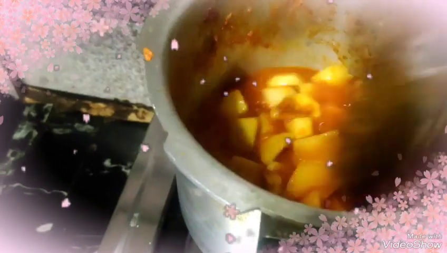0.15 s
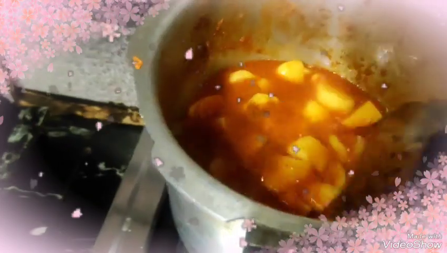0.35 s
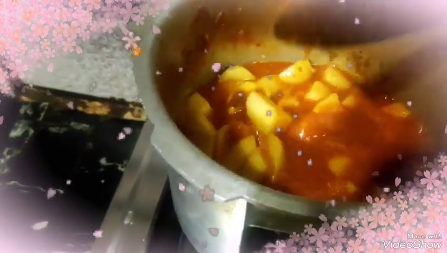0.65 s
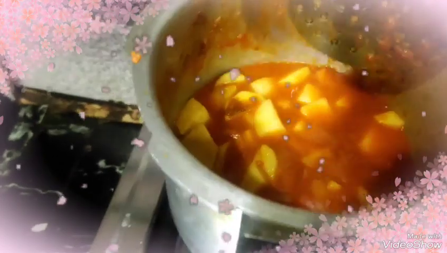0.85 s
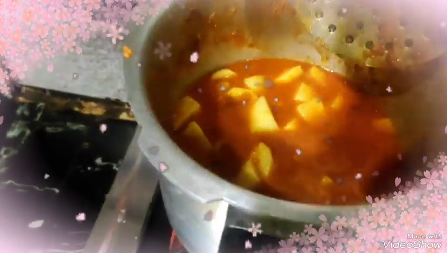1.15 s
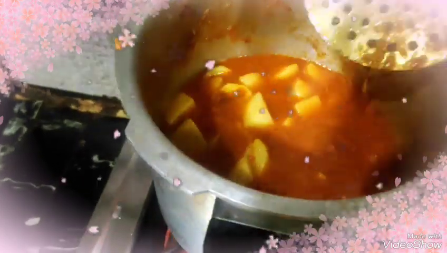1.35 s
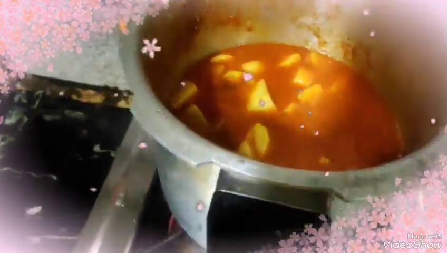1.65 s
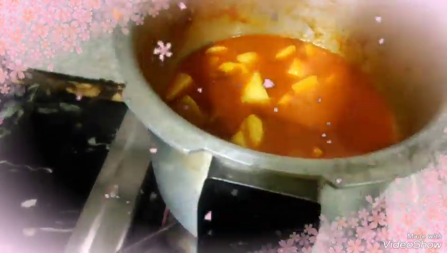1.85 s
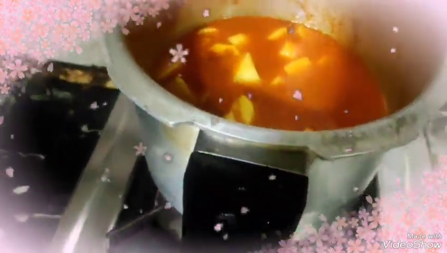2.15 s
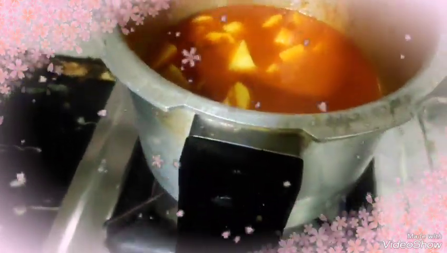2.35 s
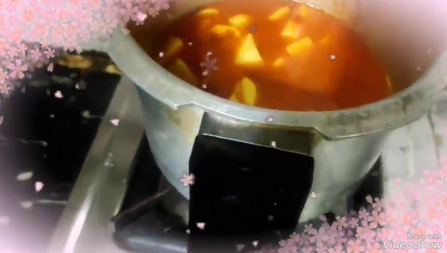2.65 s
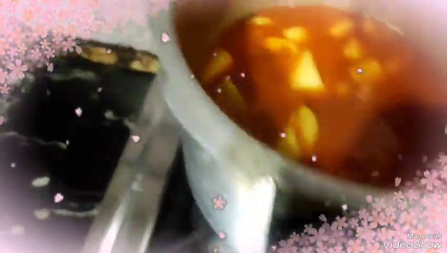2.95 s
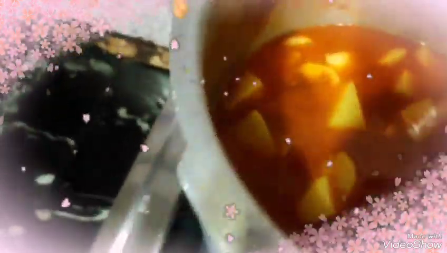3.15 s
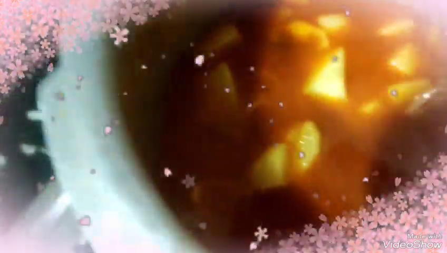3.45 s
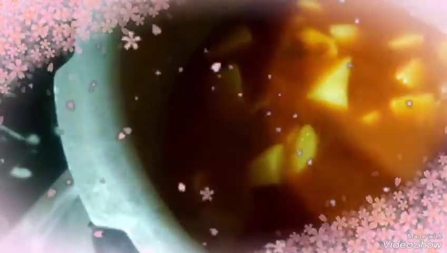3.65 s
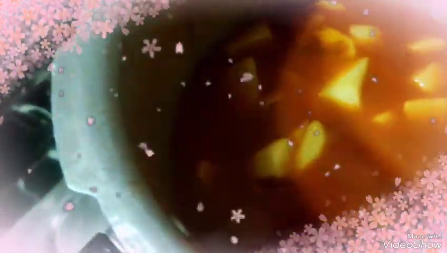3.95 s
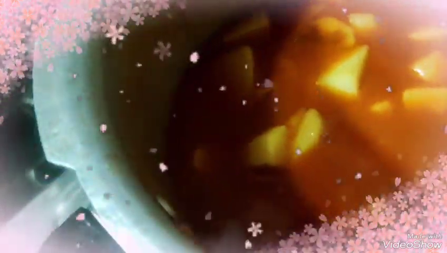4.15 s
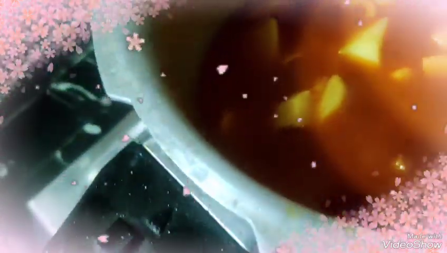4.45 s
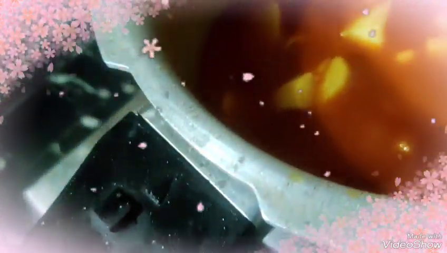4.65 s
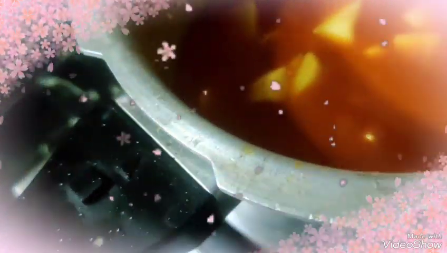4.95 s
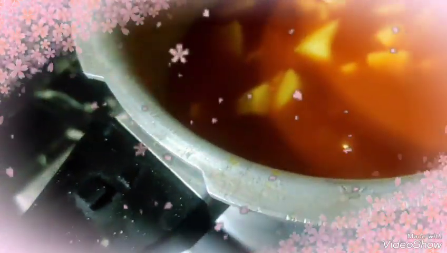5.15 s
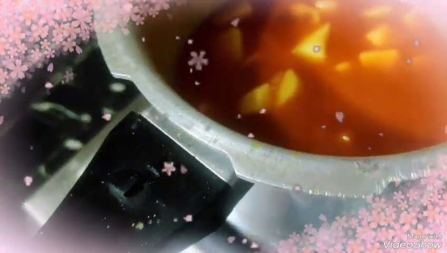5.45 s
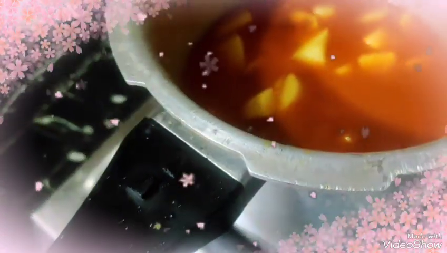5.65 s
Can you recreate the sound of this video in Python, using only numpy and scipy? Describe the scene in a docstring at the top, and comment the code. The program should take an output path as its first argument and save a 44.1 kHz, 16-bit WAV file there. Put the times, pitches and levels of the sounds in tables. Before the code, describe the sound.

Sharp clanging ladle knocks on a thick metal pot, a near-silent pause, then jerky rasping scrapes with bright squeals in a small hard kitchen.

```python
"""Stirring curry and knocking the ladle

A steel ladle stirs curry in a thick metal pot, is knocked four times on the rim to shake it clean,
clinks lightly, and then scrapes hard over the metal. Each contact mixes bursts of shaped noise with
fading sine waves: it clicks, rings the metal and rocks the pot. Rising tones make the curry slop,
jerky noise makes the scrape, and a small hard kitchen with a low hum answers close to the microphone."""
import sys
import numpy as np
from scipy import signal
from scipy.fft import rfft, irfft
from scipy.io import wavfile
from scipy.ndimage import uniform_filter1d, map_coordinates

SR = 44100
rng = np.random.default_rng(int(sys.argv[2]) if len(sys.argv) > 2 else 0)


def log_audio(samples):
    """Write samples as a 16-bit WAV file to the path given in sys.argv[1]."""
    # one column per channel
    frames = np.atleast_2d(samples).T
    # limit to full scale, then quantise
    limited = np.clip(frames, -1, 1)
    pcm = np.round(limited * 32767).astype(np.int16)
    wavfile.write(sys.argv[1], SR, pcm)


N = 256380
TIME = np.arange(N) / SR  # seconds through the scene
AGE = TIME[:SR]  # seconds since a contact, up to one
TOP_HZ = 16300  # upper limit of the sound

# All levels in the tables are those before the final mix.
# square blows that rock the whole pot: start_s [s], strength_db [dB], click_db [dB], wall_ring_db [dB],
# favoured_hz [Hz], favoured_db [dB], left_minus_right_db [dB]
BLOWS = [(0.072, -43.5, -37, -65.5, 236, -33, -1), (0.915, -18, -10, -25.5, 360, -25, 3.5),
         (1.165, -14, -4.5, -32, 3093, -29.5, 0), (1.4058, -16.5, -7, -25, 1364, -19, -2),
         (1.974, -29.5, -11.5, -43.5, 2767, -37, -1), (1.995, -34.5, -22, -62, 347, -30, 4),
         (2.013, -33, -18, -48.5, 809, -31, 1.5), (2.057, -51, -22, -43, 5280, -48, -1),
         (4.019, -51.5, -54, -73, 1036, -50.5, 1)]
# glancing hits on the wall: start_s [s], strength_db [dB], click_db [dB], wall_ring_db [dB],
# favoured_hz [Hz], favoured_db [dB]
GLANCES = [(0.2759, -17, -10, -29, 8700, -43), (0.295, -41, -30, -25.5, 6580, -37),
           (0.395, -27, -20.5, -50, 368, -41), (0.48, -21.5, -14.5, -57, 733, -20),
           (0.534, -37, -28.5, -50.5, 2620, -60), (4.105, -56, -66, -68, 770, -48.5),
           (4.229, -45, -63, -62, 2780, -76), (4.835, -54.5, -44, -62, 690, -57),
           (4.875, -29.5, -27.5, -45, 6040, -36), (4.894, -31, -18, -48, 7170, -34),
           (5.055, -33.5, -47, -52, 2280, -44), (5.136, -32.5, -21, -40, 865, -44),
           (5.212, -37, -34, -35, 6370, -31), (5.41, -43, -44, -57, 4730, -40),
           (5.556, -27.5, -38, -40, 1610, -18.5), (5.575, -20, -30, -47, 483, -27.5),
           (5.67, -28, -31, -21, 5200, -31), (5.771, -17, -19, -23, 7030, -37)]
# scraping strokes: start_s [s], length_s [s], rasp_db [dB], swell_db over the stroke [dB],
# edge_hiss_db relative to the rasp [dB]
STROKES = [(0.086, 0.042, -58.5, 7, -6), (0.395, 0.02, -36, -11, -14), (0.443, 0.015, -59, -15, -18),
           (1.764, 0.011, -58, 4.5, 2.5), (3.589, 0.265, -67, -16, 18.5), (3.938, 0.33, -62, 2.5, -2.5),
           (4.447, 0.062, -67.5, 1, 5), (4.61, 0.025, -66, -2.5, 8), (4.85, 0.021, -39, 8, -20),
           (4.875, 0.026, -29.5, 2.5, 2.5), (4.963, 0.018, -46, 9, -15), (5.057, 0.025, -30.5, -2.5, 0),
           (5.09, 0.025, -37.5, -6, 6), (5.14, 0.06, -31.5, -3, 10), (5.201, .022, -27, -2.5, 2.5),
           (5.237, 0.041, -30.5, 1.5, -3.5), (5.293, 0.035, -28.5, -4.5, -13), (5.335, 0.021, -30, 1.5, 2),
           (5.401, 0.03, -28, -3.5, -28), (5.472, 0.041, -43.5, 5, -14), (5.56, 0.031, -27, 2, -0.5),
           (5.615, 0.019, -33, 1, 4), (5.649, 0.093, -23.5, 3.5, 2), (5.759, 0.042, -20, 3, -0.5)]
# ringing modes of the whole pot: pitch_hz [Hz], level_db [dB], t60_s, time to fall 60 dB [s]
POT_MODES = [(280.1, -18, 0.35), (344.8, 5.5, 0.36), (461, -11, 0.49), (549, -10, 0.32),
             (709.4, 10.5, 0.31), (823, 4, 0.27), (859, 1.5, 0.21), (927, -5, 0.2), (1010, -4.5, 0.34),
             (1120, -13, 0.1), (1290, -8.5, 0.22)]
# spectrum of the rocking pot: frequency_hz [Hz], density_db [dB per Hz]
BODY_SPECTRUM = [(30, -40), (70, -20), (105, -8.5), (140, -17), (190, -5), (270, -7), (360, 2.5),
                 (560, -10.5), (780, 2.5), (1000, -10), (1600, -21.5), (4000, -54.5)]
# the sloshing curry makes each ring's pitch wander by about this share
POT_WANDER, WALL_WANDER = 0.015, 0.003


def undb(db):
    """Turn decibels into a plain gain."""
    return 10 ** (np.asarray(db) / 20)


def unit(x):
    """Scale to an average strength (rms) of 1."""
    return x / np.sqrt(np.mean(x ** 2))


def gains(points, size):
    """Read a spectrum of (Hz, dB) points as a gain for each frequency of a transform."""
    hz, db = np.transpose(points)
    bins_hz = np.arange(size // 2 + 1) * SR / size
    return undb(np.interp(np.log(bins_hz + 1), np.log(hz), db))


def colour(x, points):
    """Shape a signal's spectrum, at rms 1."""
    return unit(irfft(rfft(x) * gains(points, len(x)), len(x)))


def noise(points, size=SR, patchy_db=0, patch_hz=140):
    """Countless overlapping modes as noise; the contact point favours some groups of them."""
    hz = np.arange(size // 2 + 1) * SR / size
    patches = np.interp(hz / patch_hz, np.arange(1024), rng.standard_normal(size=1024))
    patchy = irfft(rfft(rng.standard_normal(size)) * undb(patchy_db * patches), size)
    return colour(patchy, points)


def fade(t60):
    """One second of exponential decay, falling 60 dB in t60 seconds."""
    return np.exp(-np.log(1000) * AGE / max(t60, 1e-3))


def ring(modes, scatter_db):
    """Struck modes starting at about rms 1; each contact point weights them differently."""
    hz, db, t60 = np.transpose(modes)
    weight = undb(db + scatter_db * rng.standard_normal(len(hz)))
    waves = [w * fade(d) * np.sin(2 * np.pi * (f * AGE + rng.random()))
             for f, w, d in zip(hz, weight, t60)]
    return sum(waves) / np.sqrt(np.sum(weight ** 2) / 2)


def shimmer(points, count=130, scatter_db=5):
    """The crowd of modes that one contact point reaches, each heard differently at the two ports."""
    lines = np.zeros((2, SR // 2 + 1), complex)
    hz = (TOP_HZ * (np.arange(count) + rng.random(count)) / count).astype(int)
    turns = rng.random(count) + rng.random((2, count)) / 2
    lines[:, hz] = undb(scatter_db * rng.standard_normal(count)) * np.exp(2j * np.pi * turns)
    return unit(irfft(lines * gains(points, SR), SR))


def buzz(depth):
    """Uneven flutter of a ring while the ladle still trembles against the wall; rms 1."""
    return unit(1 + depth * unit(uniform_filter1d(rng.standard_normal(SR), size=130)))


def slosh(x, share, turns_per_s=24):
    """Two copies of a ring whose pitches wander apart, so that it beats unevenly."""
    turns = rng.standard_normal(size=(2, 64))
    clocks = []
    for row in turns:
        wander = np.interp(AGE * turns_per_s, np.arange(len(row)), row)
        clocks.append(np.cumsum(1 + share * wander))
    return sum(map_coordinates(x, [clock], order=1) for clock in clocks) / np.sqrt(2)


def diffuse(mid, side, alike_hz=603):
    """Sound from all around: alike at both ports in the bass, unrelated in the treble."""
    hz = np.arange(len(mid) // 2 + 1) * SR / len(mid)
    alike = 1 / (1 + (hz / alike_hz) ** 2)
    m = rfft(mid) * np.sqrt((1 + alike) / 2)
    s = rfft(side) * np.sqrt((1 - alike) / 2)
    return irfft(np.array([m + s, m - s]), len(mid))


def add(out, s, sound, pan_db=0):
    """Mix a sound into both channels at a time; pan_db is left minus right."""
    start = max(int(s * SR), 0)
    part = sound[..., :max(N - start, 0)]
    out[:, start:start + part.shape[-1]] += undb(np.array([[pan_db], [-pan_db]]) / 2) * part


def kitchen(rush_db=-60):
    """Steady soft rush of the stove and the house as shaped noise, with a faint hum of sine waves."""
    # spectrum of the rush: frequency_hz [Hz], density_db [dB per Hz]
    rush_spectrum = [(15, -28.5), (25, -5), (102, -6.5), (123, -8.5), (195, -2), (301, -13), (335, -9.5),
                     (405, -10), (754, -19), (962, -18), (1190, -25), (1700, -20.5), (2910, -30),
                     (7110, -19.5), (9000, -24.5), (11500, -43.5), (16000, -57)]
    # mains and motor hum: pitch_hz [Hz], level_db [dB rms]
    hum_tones = [(100, -71.5), (194, -78), (338, -81), (836, -85), (936, -81), (1036, -83), (1671, -89)]
    hum = sum(undb(db) * np.sqrt(2) * np.sin(2 * np.pi * (hz * TIME + rng.random()))
              for hz, db in hum_tones)
    rush = diffuse(noise(rush_spectrum, size=N), noise(rush_spectrum, size=N))
    return undb(rush_db) * rush + hum


def bounces(s, count, gap_s, loss_db):
    """The touches of a bouncing ladle, each weaker than the last: (s, dB lost)."""
    return [(s + k * gap_s, k * loss_db) for k in range(int(round(count)))]


def clinks(tick_t60=0.06, buzz_depth=0.47, gap_s=0.018, loss_db=0.5, ring_loss=1.5):
    """Light touches tick and ring the thin, springy ladle; returns the ticks and the ring."""
    # light touches: start_s [s], tick_db [dB], ring_db [dB], touches [count], left_minus_right_db [dB]
    touches = [(0.002, -22, -40.5, 1, 11), (0.21, -47, -79, 1, -2.5), (0.276, -12, -49, 2, 2),
               (0.376, -32.5, -54, 1, 2), (0.533, -29, -31, 1, -1.5), (0.682, -71, -58, 1, -3.5),
               (1.027, -32.5, -51, 2, 2), (1.814, -42.5, -48.5, 1, 0), (2.068, -38, -51, 1, 2),
               (2.196, -47, -44.5, 1, -2), (2.967, -54.5, -76.5, 1, -3.5), (3.056, -52, -74, 1, -13.5),
               (3.393, -41.5, -47, 1, -7), (3.432, -39, -43.5, 2, -7.5), (3.444, -45.5, -36.5, 1, 5),
               (3.601, -49.5, -61.5, 1, -10.5), (4.100, -34, -44.5, 4, -0.5)]
    # ringing modes of the ladle: pitch_hz [Hz], level_db [dB], t60_s [s]
    ladle_modes = [(4850, -12, 0.3), (5510, -4, .45), (6170, -5.5, 0.2), (6470, -3, 0.3), (7240, -12, .4),
                   (7560, -8.5, 0.27), (7955, 5, .3), (8700, -9, 0.2), (10450, -2.5, 0.38),
                   (10640, -10, .15), (11190, -1.5, 0.42), (11500, -3.5, 0.22), (10800, -10, .16),
                   (13030, -8.5, .3)]
    # spectrum of a tick: frequency_hz [Hz], density_db [dB per Hz]
    tick_spectrum = [(100, -32), (500, -10), (3000, -15.5), (5500, -9), (7300, 8.5), (8700, 1.5),
                     (9600, -11), (10800, -7), (13500, -14), (16000, -21.5)]
    ticks, rings = np.zeros((2, 2, N))
    onset = 1 - np.exp(-AGE / 0.0012)
    grip = fade(0.7)  # the hand damps the ring
    for s, tick_db, ring_db, count, pan_db in touches:
        for at, lost in bounces(s, count, gap_s, loss_db):
            tick = noise(tick_spectrum, patchy_db=5.0) * fade(tick_t60) * onset
            add(ticks, at, undb(tick_db - lost) * tick, pan_db)
            tone = buzz(buzz_depth) * ring(ladle_modes, scatter_db=4) * grip * onset
            # a rebound loses more ring than tick
            add(rings, at, undb(ring_db - ring_loss * lost) * tone, pan_db)
    return ticks, rings


def singing(release_t60=0.082, buzz_depth=0.16, twin_db=-5, twin_hz=24):
    """Single modes: a hit rings one that beats with its twin; a touch or friction holds one briefly and lets
    go."""
    # brief single tones: the edge sticks and sings, except the first two rows, the ladle's 7955 Hz ring:
    # start_s [s], pitch_hz [Hz], level_db [dB], held_s [s], pitch_waver [share of the pitch], glide [octaves
    # per s]
    squeals = [(0.002, 7960, -30, 0.017, 0.0028, 0), (0.533, 7955, -18.5, 0.004, 0.0008, 0.5),
               (3.446, 5470, -47.5, 0.024, 0.003, 2), (3.5, 5430, -64, 0.355, 0.0244, 0),
               (3.695, 5420, -54, 0.06, 0.0146, -1), (5.075, 5000, -44, 0.014, .004, 1),
               (5.15, 885, -36, 0.089, 0.0024, -1.1), (5.55, 7270, -16, 0.031, 0.0012, 0),
               (5.551, 1700, -28.5, .085, 0.0082, -3.5), (5.556, 5307, -43, 0.074, .0015, -1),
               (5.618, 7268, -25, 0.12, 0.004, -1.5), (5.69, 860, -29, 0.039, 0.0087, -2)]
    out = np.zeros((2, N))
    for s, _, _, _, hz, db, *_ in BLOWS + GLANCES:
        t60 = 0.19 * (hz / 1000) ** 0.78  # the curry damps low modes most
        beside_hz = hz + twin_hz * rng.uniform(0.42, 1.6)
        twin = undb(twin_db) * np.sin(2 * np.pi * beside_hz * AGE)
        pair = np.sin(2 * np.pi * hz * AGE) + twin
        add(out, s, undb(db) * pair * fade(t60) * buzz(buzz_depth))
    for s, hz, db, held_s, waver, glide in squeals:
        wobble = unit(uniform_filter1d(rng.standard_normal(SR), size=120))
        pitch = hz * 2 ** (glide * np.minimum(AGE, held_s)) * (1 + waver * wobble)
        release = np.exp(-np.log(1000) * np.maximum(AGE - held_s, 0) / release_t60)
        swell = (1 - np.exp(-10 * AGE / held_s)) * release
        tone = np.sqrt(2) * np.sin(2 * np.pi * np.cumsum(pitch) / SR)
        add(out, s, undb(db) * swell * tone * buzz(buzz_depth))
    return out


def contacts_on_pot(blow_clang_db=-2, glance_body_db=-16.5, glance_pan_db=1):
    """Every hit on the pot: (s, click dB, clang dB, wall ring dB, body dB, left minus right dB)."""
    for s, db, click_db, ring_db, _, _, pan_db in BLOWS:
        yield s, click_db, db + blow_clang_db, ring_db, db, pan_db
    for s, db, click_db, ring_db, _, _ in GLANCES:
        yield s, click_db, db, ring_db, db + glance_body_db, glance_pan_db


def knocks(click_t60=0.025, clang_t60=0.066, wall_db=-2, shimmer_db=-1, shimmer_t60=0.19,
           swell_s=0.0054, rock_s=0.053, patchy_db=6, chatter=0.76, chatter_hz=62,
           snap_t60=0.0051, snap_db=-5, click_gain_db=7.5, pot_ring_db=-1.5):
    """A hard click, a clang from all round, then the heavy pot judders on its stand and rings out."""
    # spectra of the click, the clang and the wall's many weaker modes:
    # frequency_hz [Hz], density_db [dB per Hz]
    click_spectrum = [(200, -32), (1500, -16), (3000, -12.5), (5500, -6.5), (7000, 7.5), (8000, 2),
                      (9500, -14.5), (12000, -22), (16000, -34.5)]
    clang_spectrum = [(50, -36.5), (150, -19), (600, -1), (1300, 1.5), (2200, 1.5), (3000, -0.5),
                      (4500, -5), (7000, -12), (9000, -5.5), (11000, -19), (16000, -33)]
    shimmer_spectrum = [(120, -35), (700, -5), (1300, -2.5), (2000, -3), (3000, -5.5), (4500, -1.5),
                        (6500, 6.5), (8000, 3), (9500, -10.5), (12000, -14.5), (16000, -22.5)]
    # ringing modes of the pot wall: pitch_hz [Hz], level_db [dB], t60_s [s]
    wall_modes = [(1365, -8.5, 0.53), (2780, -10.5, .3), (3040, -9.5, 0.13), (3125, -3.5, 0.14),
                  (3700, -5, .2), (4310, -5.5, .2), (5060, -8.5, 0.66), (5850, -7.5, 0.16),
                  (6350, -3, 0.64), (6540, -1, 0.34), (7800, -5.5, 0.24), (8560, -0.5, .12),
                  (9500, -7, 0.042), (10750, -12, 0.22)]
    out = np.zeros((2, N))
    slower_click = undb(click_gain_db) * fade(click_t60) * (1 - np.exp(-AGE / 0.0063))
    click_shape = undb(snap_db) * fade(snap_t60) + slower_click
    for s, click_db, clang_db, ring_db, body_db, pan_db in contacts_on_pot():
        click = noise(click_spectrum, patchy_db=patchy_db) * click_shape
        clang = diffuse(noise(clang_spectrum, patchy_db=patchy_db),
                        noise(clang_spectrum, patchy_db=patchy_db)) * fade(clang_t60)
        wall = undb(wall_db) * slosh(ring(wall_modes, scatter_db=5), WALL_WANDER)
        wall = wall + undb(shimmer_db) * shimmer(shimmer_spectrum) * fade(shimmer_t60)
        rebounds = 1 + chatter * np.cos(2 * np.pi * chatter_hz * rng.uniform(0.9, 1.1) * AGE)
        rocking = rebounds * np.exp(-(AGE / rock_s) ** 4) * undb(-1.5)
        judder = diffuse(noise(BODY_SPECTRUM), noise(BODY_SPECTRUM)) * rocking
        pot_ring = slosh(ring(POT_MODES, scatter_db=3.0), POT_WANDER) * buzz(0.25)
        body = (judder + undb(pot_ring_db) * pot_ring) * (1 - np.exp(-AGE / swell_s))
        hit = undb(click_db) * click + undb(clang_db) * clang
        add(out, s, hit + undb(ring_db) * wall + undb(body_db) * body, pan_db)
    return out


def pressure_db(age, length_s, swell_db, bite_db_per_s=759.5, lift_db_per_s=142):
    """A stroke bites, is pressed steadily harder or softer, then lifts off."""
    press = swell_db * np.clip(age / length_s, 0, 1)
    bite = bite_db_per_s * np.minimum(age, 0)
    return press + bite - lift_db_per_s * np.maximum(age - length_s, 0)


def rattle(touch_t60=0.054, uneven_db=-1.0, rattle_rate=110, rattle_s=0.065, rattle_db=-9,
           catch_rate=50):
    """Quick uneven touches after blows and where the edge catches; each rings other modes."""
    # spectrum of one touch: frequency_hz [Hz], density_db [dB per Hz]
    touch_spectrum = [(90, -40), (170, -12.5), (400, -8), (1300, 1), (2000, -0.5), (3000, -2.5),
                      (5000, -1.5), (7000, 0), (9000, -11), (16000, -30.5)]
    out = np.zeros((2, N))
    for s, db, *_, pan_db in BLOWS:
        for delay in np.arange(1 / rattle_rate, rattle_s, 1 / rattle_rate):  # rates are touches per s
            size = undb(db + rattle_db + uneven_db * rng.uniform(-1.8, 1))
            size = size * (1 - delay / rattle_s / 2)
            at = s + delay + rng.uniform(-0.5, 0.5) / rattle_rate
            add(out, at, size * shimmer(touch_spectrum, count=60) * fade(touch_t60), pan_db)
    for s, length_s, db, swell_db, _ in STROKES:
        for delay in np.arange(0, length_s, 1 / catch_rate):
            size = undb(db + pressure_db(delay, length_s, swell_db) + uneven_db * rng.uniform(-1, 1))
            at = s + delay + rng.random() / catch_rate
            add(out, at, size * shimmer(touch_spectrum, count=45) * fade(touch_t60))
    return out


def slops(spread=0.87, cycles=8, rise=0.043):
    """Pockets of air close behind the ladle; each gulp rises in pitch as it dies."""
    # curry slopping round the ladle: start_s [s], pitch_hz, spread at random [Hz], level_db [dB],
    # length_s [s], gulp_rate [gulps per s]
    slop_events = [(0.084, 422, -32.5, 0.066, 200), (0.328, 397, -29.5, 0.17, 140),
                   (1.599, 400, -39, 0.29, 110), (2.746, 261, -45, 0.056, 80)]
    out = np.zeros((2, N))
    for s, hz, db, length_s, rate in slop_events:
        for delay in np.arange(0, length_s, 1 / rate):
            pitch = hz * np.exp(spread * rng.uniform(-0.97, 1))
            decay = fade(cycles / pitch)
            rising_pitch = pitch * (1 + rise * (1 - decay))
            gulp = np.sin(2 * np.pi * np.cumsum(rising_pitch) / SR) * decay
            at = s + delay + rng.random() / rate / 2
            add(out, at, undb(db) * gulp * (1 - np.exp(-AGE * pitch)))
    return out


def slide(x):
    """The moving contact crosses nodes and crests of the wall, so groups of modes swell and sink."""
    depth_db, patch_hz, change_rate, broad_hz = 11, 150, 16, 600  # change_rate is per second
    hz, s, frames = signal.stft(x, SR, nperseg=768)
    places = np.meshgrid(hz / patch_hz, s * change_rate, indexing="ij")
    coupling = map_coordinates(rng.standard_normal(size=(256, 128)), places, order=1)
    depth = depth_db * (hz / (hz + broad_hz))[:, None]  # low modes are too broad to have sharp nodes
    swelling = frames * undb(depth * np.minimum(coupling, 1) - depth / 3)
    return unit(signal.istft(swelling, SR)[1][..., :N])


def scrape(slip_rate=500, slip_db=-1.5, slip_t60=0.03, rasp_db=-1, hiss_db=-3,
           rung_t60=0.075, rung_db=-2, plain_db=-5):
    """The edge slips in uneven jerks that rasp in the wall; each stroke rings its own crowd of modes."""
    # spectra of the wall's rasp and the edge's hiss: frequency_hz [Hz], density_db [dB per Hz]
    rasp_spectrum = [(40, -45.5), (100, -46), (160, 2.5), (250, -1), (500, 2), (850, 3.5), (1400, 1),
                     (2800, 1.5), (4500, 0.5), (6500, -1.5), (9000, -19.5), (12000, -30), (16000, -43)]
    hiss_spectrum = [(1000, -60.5), (4300, -20.5), (5000, 1.5), (5500, -2), (6200, 9.5), (7100, 15),
                     (8000, 9), (9200, -6.5), (10000, -20), (15000, -32.5)]
    out = np.zeros((2, N))
    slip_sizes = undb(slip_db * np.minimum(rng.exponential(size=N), 3))
    slips = (rng.random(N) < slip_rate / SR) * slip_sizes  # slip_rate is slips per second
    jerks = np.sqrt(np.abs(signal.fftconvolve(slips ** 2, fade(slip_t60) ** 2)[:N]))
    near, far = slide(jerks * rng.standard_normal((2, N)))  # the two sides of the pot
    rasp = undb(rasp_db) * diffuse(colour(near, rasp_spectrum), colour(far, rasp_spectrum))
    hiss = undb(hiss_db) * colour(near, hiss_spectrum)
    for s, length_s, db, swell_db, edge_db in STROKES:
        span = np.abs(TIME - s - length_s) < 0.5
        pressure = undb(db + pressure_db(TIME[span] - s, length_s, swell_db))
        rub = pressure * (rasp[:, span] + undb(edge_db) * hiss[span])
        crowd = shimmer([(1, 0), (TOP_HZ, 0)], count=200, scatter_db=2)
        modes = unit(crowd * fade(rung_t60))
        rung = unit(signal.fftconvolve(rub, modes, axes=1)[:, :span.sum()]) * np.std(rub)
        out[:, span] += undb(plain_db) * rub + undb(rung_db) * rung
    return out


def thumps(thud_t60=0.11, attack_s=0.003, pan_db=2, ring_db=-11):
    """The rocked pot drops back on its stand: a dull noise thud and a little of its ring."""
    # landings: start_s [s], level_db [dB]
    landings = [(0.924, -17), (0.96, -16), (1.2, -14.5), (1.29, -30), (1.447, -21.5), (1.505, -24.5),
                (2.005, -27), (4.045, -51), (4.125, -46)]
    out = np.zeros((2, N))
    for s, db in landings:
        thud = diffuse(noise(BODY_SPECTRUM), noise(BODY_SPECTRUM)) * fade(thud_t60)
        pot_ring = slosh(ring(POT_MODES, scatter_db=3.0), POT_WANDER)
        landing = thud + undb(ring_db) * pot_ring
        add(out, s, undb(db) * landing * (1 - np.exp(-AGE / attack_s)), pan_db)
    return out


def handling(middle_s=4, half_length_s=0.11, level_db=-51):
    """A soft low rumble of noise swells and sinks as the hand shifts on the microphone."""
    spectrum = [(12, -20), (30, 0), (55, -5), (120, -22), (400, -60)]  # (Hz, dB per Hz)
    swell = np.exp(-((TIME - middle_s) / half_length_s) ** 2)
    return undb(level_db) * noise(spectrum, size=N) * swell


def room(dry, first_s=0.00043, treble_db=-2, top_db=-5, bright_t60=0.51, boom_db=-15, boom_t60=0.26,
         level_db=-6):
    """Hard kitchen walls return a dense noise tail, with a weaker, duller part that dies sooner."""
    walls = [(100, 0.0073), (4000, 0.0074), (8000, treble_db), (14000, top_db)]  # (Hz, dB per Hz)
    boom = [(400, -7.0), (1500, 0.0), (5000, -30.0)]
    bright = diffuse(noise(walls), noise(walls)) * fade(bright_t60)
    dull = diffuse(noise(boom), noise(boom)) * fade(boom_t60) * undb(boom_db)
    onset = 1 - np.exp(-(AGE / first_s) ** 2)
    response = unit((bright + dull) * onset) / np.sqrt(SR)
    return undb(level_db) * signal.fftconvolve(dry, response, axes=1)[:, :N]


def scene(singing_room_db=-10, scrape_room_db=-4):
    """Ladle, pot and curry in the kitchen; rings and scrape sound closer and drier than the knocks."""
    background = kitchen()
    ticks, rings = clinks()
    tones = singing() + rings
    contacts = knocks() + thumps() + rattle() + ticks + slops()
    scraping = scrape()
    echo = room(contacts + undb(scrape_room_db) * scraping + undb(singing_room_db) * tones)
    return undb(1.0) * (contacts + scraping + tones) + echo + background + handling()


def record(dry):
    """Left and right differ in tone and in phase: left has more bass, right more near 8 kHz; peaks clip."""
    # level between the two microphone ports: frequency_hz [Hz], left_minus_right_db [dB]
    port_levels = [(60, 6), (400, 4.5), (1300, 3.5), (2400, 0), (4400, 1), (8000, -7.5), (15000, 1.5)]
    # phase by which the left channel leads: frequency_hz [Hz], lead [radians]
    port_lead = [(800, 0), (1550, 2.5), (2500, 6.5), (3200, 6.5), (3750, 11), (4500, 13)]
    lead = np.interp(np.arange(N // 2 + 1) * SR / N, *np.transpose(port_lead))
    tilt = np.sqrt(gains(port_levels, N)) * np.exp(0.5j * lead)  # half to each port
    heard = np.clip(irfft(rfft(dry) * np.array([tilt, 1 / tilt]), N), -1, 1)
    top_cut = signal.ellip(8, 0.2, 80, TOP_HZ, fs=SR, output="sos")
    return signal.sosfilt(top_cut, heard)


dry = scene()
out = record(dry)
log_audio(out)
```